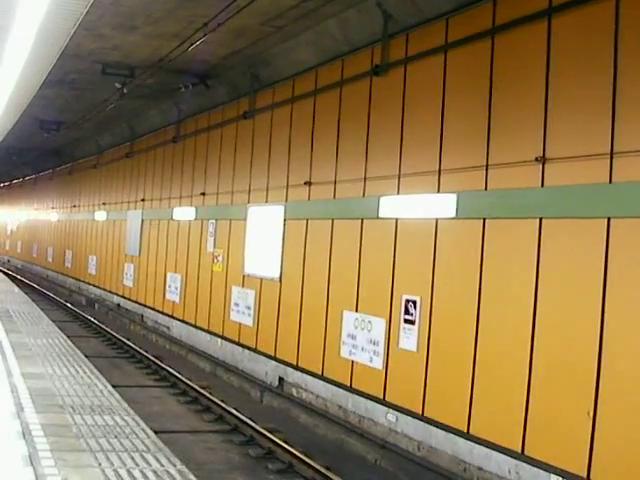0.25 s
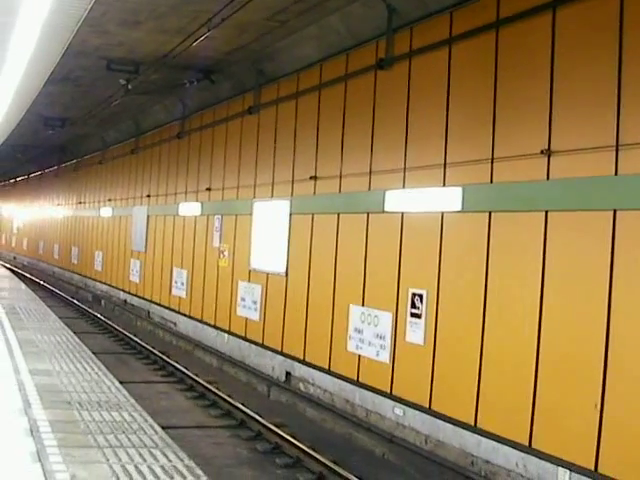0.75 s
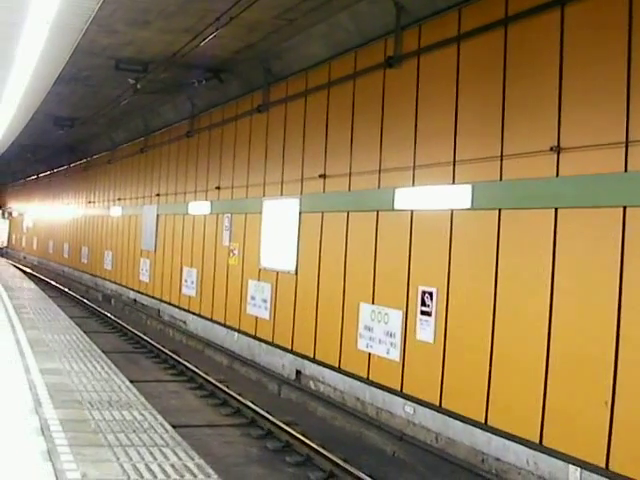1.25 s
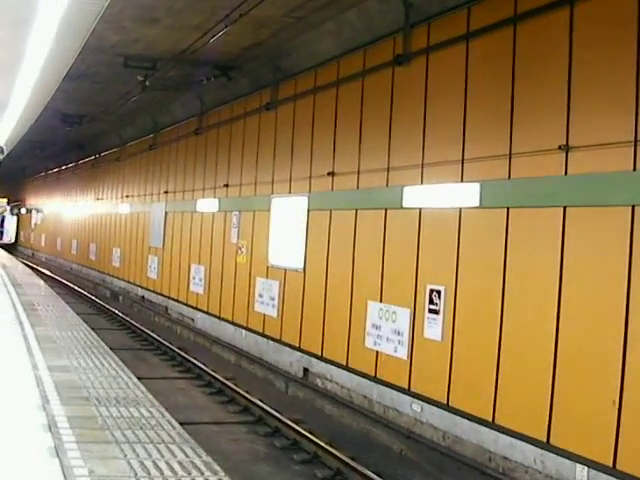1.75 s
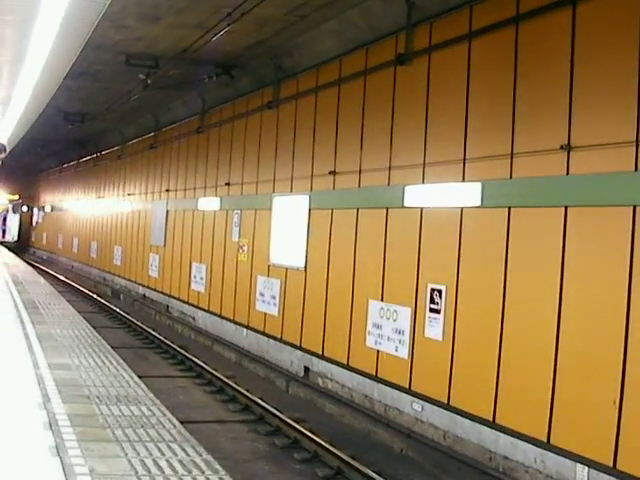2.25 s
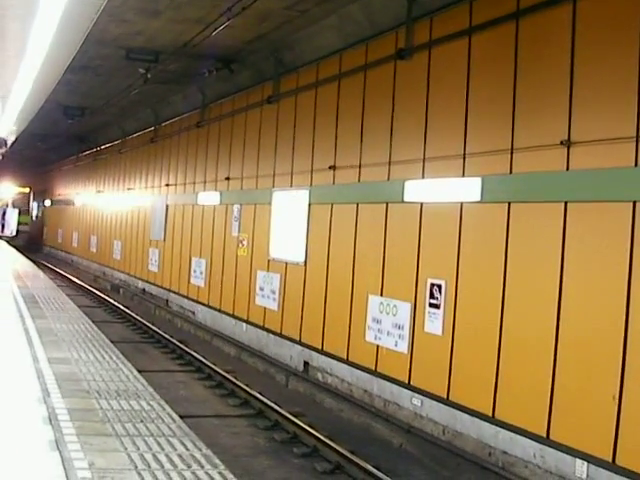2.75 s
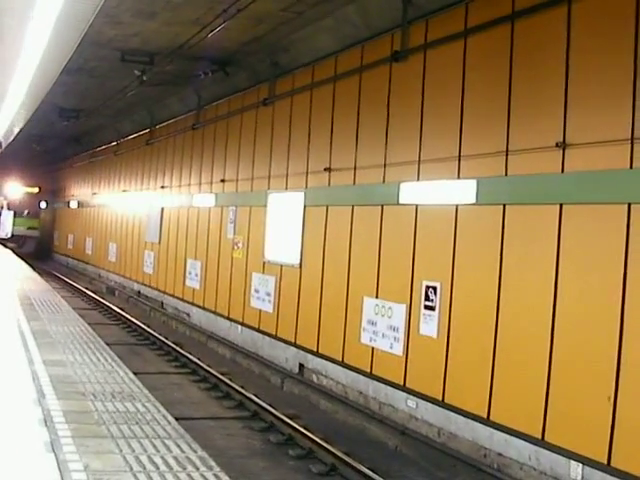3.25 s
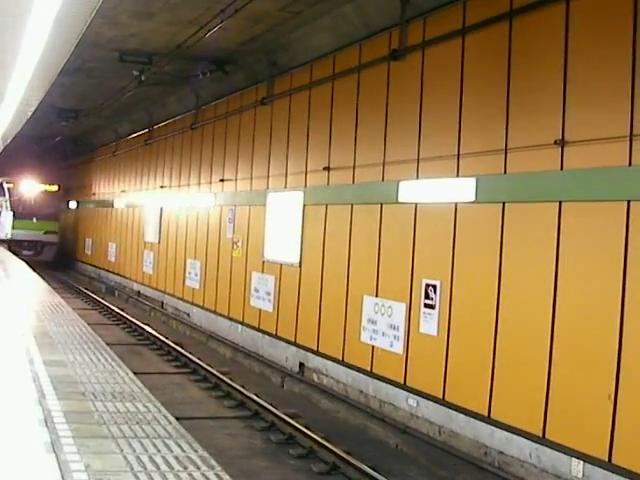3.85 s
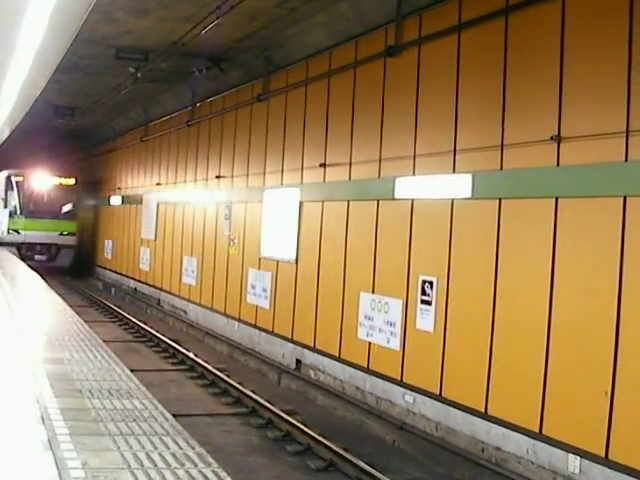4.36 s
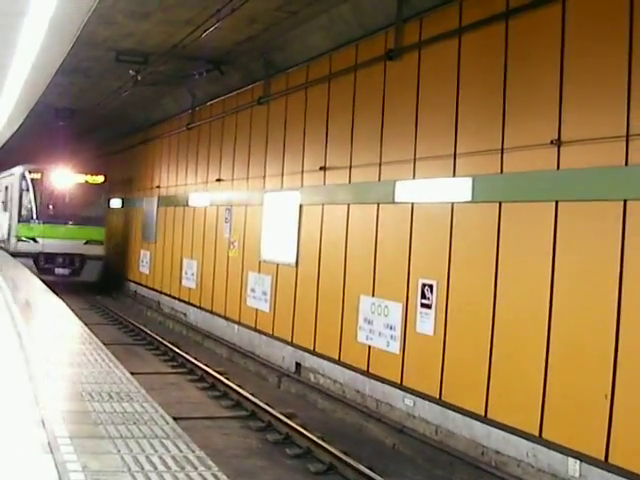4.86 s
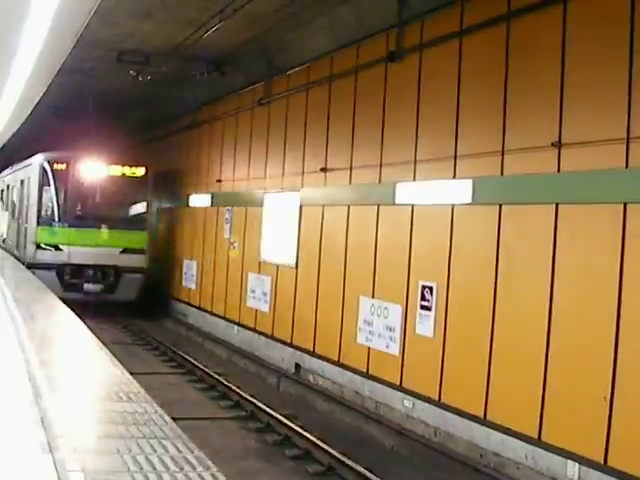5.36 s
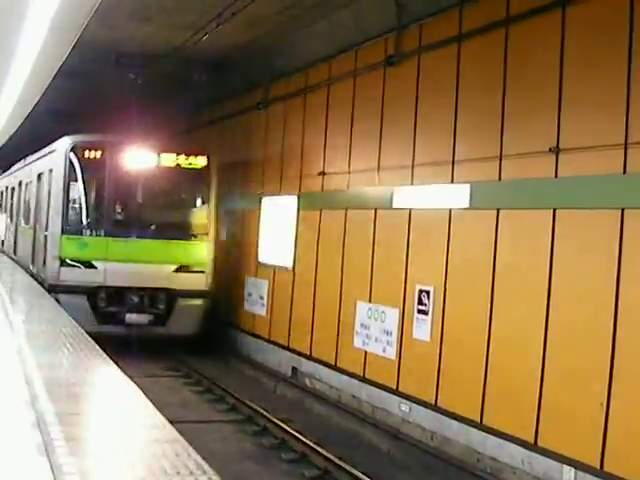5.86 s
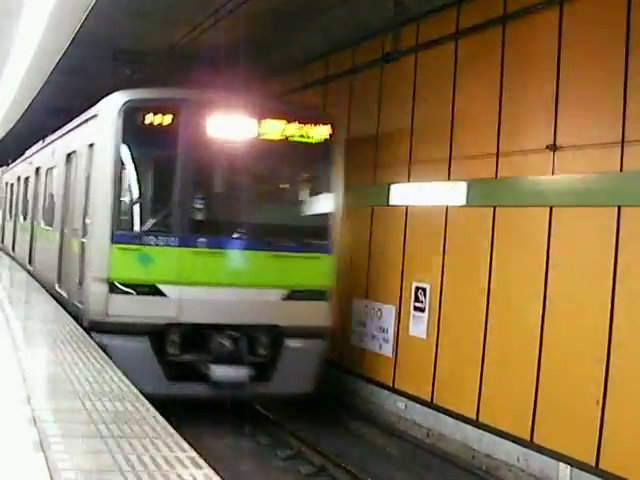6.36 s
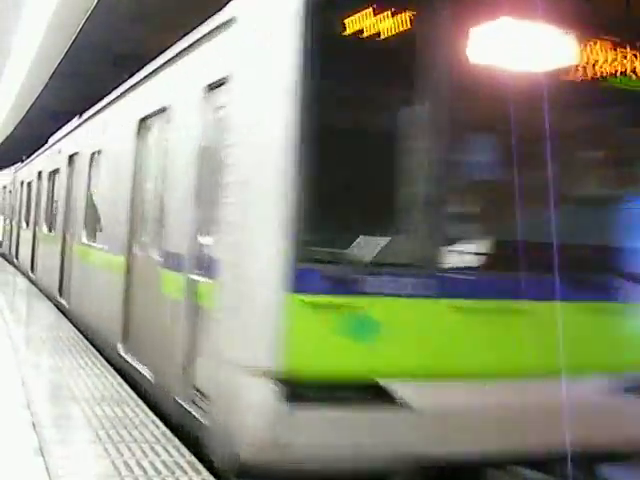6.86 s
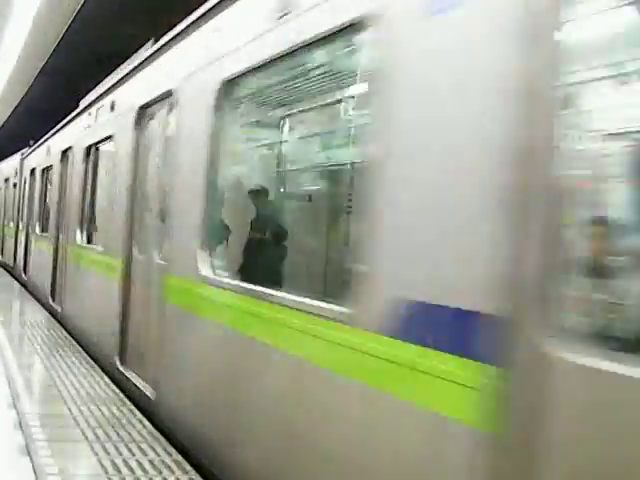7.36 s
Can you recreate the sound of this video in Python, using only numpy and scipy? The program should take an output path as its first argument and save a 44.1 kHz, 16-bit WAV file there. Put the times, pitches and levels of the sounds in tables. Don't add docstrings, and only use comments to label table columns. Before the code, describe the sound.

Steady booming rumble and steel rail roar fill an underground platform as a train arrives, thumping over joints and hissing brightly as it passes.

```python
import sys
import numpy as np
from scipy import signal
from scipy.fft import rfft, irfft, next_fast_len
from scipy.io import wavfile
from scipy.ndimage import uniform_filter1d, map_coordinates

SR = 44100
rng = np.random.default_rng(int(sys.argv[2]) if len(sys.argv) > 2 else 0)


def unload_wav(signal):
    wavfile.write(
        sys.argv[1],
        SR,
        np.round(np.clip(np.atleast_2d(signal).T, -1, 1) * 32767).astype(np.int16),
    )


def boost_factor(decibels):
    exponent = np.asarray(decibels, float) / 20
    return 10 ** exponent


N = 335821
SIZE = next_fast_len(N + SR // 2)
HZ = np.maximum(np.fft.rfftfreq(SIZE, 1 / SR), 1)
TIME_S = np.arange(N) / SR


def in_time(rows):
    s, *columns = np.transpose(rows)
    return [np.interp(TIME_S, s, c) for c in columns]


def at_hz(points):
    hz, value = np.transpose(points)
    return np.interp(np.log(HZ), np.log(hz), value)


def swell(at_s, half_s):
    return np.exp(-((TIME_S - at_s) / half_s) ** 2)


def swells(rows):
    return sum(db * swell(s, half_s) for s, db, half_s in rows)


def drift(rate_hz):
    r = np.exp(-80 * np.pi * rate_hz / SR)
    white = rng.standard_normal(N // 40 + 2002)
    slow = signal.lfilter([1], [1, -2 * r, r * r], white)[2000:]
    slow = slow / np.sqrt(np.mean(slow ** 2) + 1e-20)
    return np.interp(np.arange(N) / 40, np.arange(len(slow)), slow)


# f/Hz, share
PORT_LIKENESS = [(60, 0.58), (130, 0.86), (280, 0.85), (610, 0.69), (1330, 0.7), (2870, 0.33), (4500, 0.38),
                 (5600, 0.17), (6500, 0.24), (7800, 0.06)]
# f/Hz, level/dB
PORT_LEVEL = [(60, -1), (110, -3.5), (200, -5), (360, -6), (670, -5.5), (1220, -6.5), (2220, -1.5),
              (4050, 4.5), (7400, -0.5), (13500, -8)]
# f/Hz, phase/rad
PORT_PHASE = [(150, -.15), (400, -.1), (700, .2), (1030, .4), (2800, 1.0), (3700, .2), (4700, .6),
              (5800, 3.0), (7800, 3.1)]


def two_ports(shared, own):
    alike = np.clip(at_hz(PORT_LIKENESS), 0, 1)
    turn = boost_factor(at_hz(PORT_LEVEL) / 2) * np.exp(.5j * at_hz(PORT_PHASE))
    mixed = np.sqrt(alike) * shared + np.sqrt(1 - alike) * own
    return mixed * np.array([turn, 1 / turn])


def heard(waves):
    spectra = rfft(waves, SIZE)
    return irfft(two_ports(spectra[0], spectra[1:]), SIZE)[:, :N]


def rolling_noise(spectrum, level_db, modes=(), swell_db=1.0, patch_db=1.0, rate_hz=8.0, bands=4):
    white = rfft(rng.standard_normal((3, SIZE)))
    colour_db = at_hz(spectrum)
    for hz, width_hz, db in modes:
        colour_db = colour_db + db / (1 + (2 * (HZ - hz) / width_hz) ** 2)
    low_hz, high_hz = spectrum[0][0], spectrum[-1][0]
    sound = two_ports(white[0], white[1:]) * boost_factor(colour_db) * (HZ > low_hz) * (HZ < high_hz)
    place = (bands - 1) * np.log(HZ / low_hz) / np.log(high_hz / low_hz)
    together_db, out = swell_db * drift(rate_hz), 0
    for k in range(bands):
        band = irfft(sound * np.maximum(1 - abs(place - k), 0), SIZE)[:, :N]
        out = out + band * boost_factor(together_db + patch_db * drift(rate_hz))
    return boost_factor(level_db) * out / np.sqrt(np.mean(out.mean(axis=0) ** 2))


def resonance(x, hz, width_hz):
    r = np.exp(-np.pi * width_hz / SR)
    poles = [1, -2 * r * np.cos(2 * np.pi * hz / SR), r * r]
    return signal.lfilter([(1 - r * r) / 2, 0, (r * r - 1) / 2], poles, x)


def echo_clouds(events, rise_s, width_hz, level_db):
    out, t = np.zeros((3, SIZE)), np.arange(SR // 3) / SR
    for s, db, hz, t60_s in events:
        envelope = (1 - np.exp(-t / rise_s)) * boost_factor(-60 * t / max(t60_s, .03))
        cloud = rng.standard_normal((3, len(t))) * envelope
        rung = resonance(resonance(cloud, hz, width_hz), hz, 2 * width_hz)
        at = round(s * SR)
        out[:, at:at + len(t)] += boost_factor(db + level_db) * rung / abs(rung).max(axis=1, keepdims=True)
    return out[:, :N]


def load_swings(events, rise_s, t60_s, trim_db):
    out, t = np.zeros((3, SIZE)), np.arange(SR // 6) / SR
    shape = (1 - np.exp(-t / rise_s)) ** 2 * boost_factor(-60 * t / t60_s)
    shape = shape / shape.max()
    for (s, db, hz), start in zip(events, rng.uniform(0, 2 * np.pi, (len(events), 3))):
        at = round(s * SR)
        wave = np.sin(2 * np.pi * hz * t + start[:, None])
        out[:, at:at + len(t)] += boost_factor(db + trim_db) * shape * wave
    return out[:, :N]


# t/s, level/dB
NEARNESS = [(0.0, -38), (0.04, -34.5), (0.42, -42), (0.59, -40), (0.9, -42), (3.73, -37.5), (3.79, -44.5),
            (3.86, -39.5), (5.11, -38), (5.81, -33), (5.85, -35.5), (6.06, -31.5), (6.42, -36),
            (6.7, -30.5), (6.9, -32), (7.0, -34.5), (7.5, -33), (7.61, -35)]


def nearness_db():
    return in_time(NEARNESS)[0]


# f/Hz, density/dB per Hz
STATION_SPECTRUM = [(13, -55), (22, -45), (65, 0), (124, -1.5), (150, -4.5), (200, -63), (330, -120)]


def station_rumble():
    return rolling_noise(STATION_SPECTRUM, -39.5, swell_db=-0.8, patch_db=-2.5, rate_hz=11.0, bands=2)


# f/Hz, density/dB per Hz
BOOM_SPECTRUM = [(74, -53), (125, -21.5), (151, -12), (183, -3.5), (252, 1), (294, -0.5), (351, -25),
                 (380, -6.5), (490, -45), (840, -120)]
# f/Hz, width/Hz, level/dB
BOOM_MODES = [(185.5, 8.5, 5), (245.9, 5.9, 5), (270, 9.5, 4), (296.5, 8.6, 4)]
# t/s, rise/dB, half length/s
BOOM_SURGES = [(0.077, 0, 0.012), (0.27, 4.5, 0.16), (0.516, 5, 0.069), (1.785, 4, 0.015), (2.424, 3, 0.11),
               (2.745, 4.5, 0.24), (3.0, 2, 0.15), (4.547, -0.5, 0.17), (3.4, 1.5, 0.47),
               (3.874, 6.5, 0.019), (5.003, 10, 0.02), (5.7, 2.5, 0.7), (6.45, 4, 0.024), (7.062, 7, 0.024),
               (7.163, 10, 0.02), (7.416, 5.5, 0.092)]


def tunnel_boom():
    start_db, sag_db_per_s = -24.5, -0.315
    level_db = start_db + sag_db_per_s * TIME_S + swells(BOOM_SURGES)
    return rolling_noise(BOOM_SPECTRUM, level_db, BOOM_MODES,
                         swell_db=0.78, patch_db=1.0, rate_hz=8.1, bands=3)


# f/Hz, density/dB per Hz
ROAR_SPECTRUM = [(190, -15.5), (330, 3), (360, -11), (436, 1.5), (497, -0.5), (744, 4), (1010, 0.5),
                 (1290, -8.5), (1600, -9), (2080, -80), (3520, -120)]
# f/Hz, width/Hz, level/dB
RAIL_MODES = [(422, 58, 2), (626, 27, 1.5), (780, 59, -1), (1040, 17, 1), (1212, 16, 8.5)]
# t/s, rise/dB, half length/s
ROAR_SWELLS = [(.1, 1, 0.087), (1.15, -0.5, .15), (1.95, 0.5, 0.079), (2.45, 0, .12), (2.95, 0, .12),
               (3.4, 0.5, 0.24), (3.85, 1, 0.071), (4.9, 0.5, 0.14), (5.15, -0.5, .1), (6.8, 0, 0.11),
               (7.06, 1.5, .04)]


def rail_roar():
    return rolling_noise(ROAR_SPECTRUM, -22.0 + swells(ROAR_SWELLS), RAIL_MODES,
                         swell_db=0.4, patch_db=0.05, rate_hz=14.0, bands=6)


# f/Hz, density/dB per Hz
RING_SPECTRUM = [(820, -14.5), (1400, -1), (1830, -5.5), (2380, -7), (2620, -13), (3200, -11.5),
                 (4160, -20), (7040, -120)]
# f/Hz, width/Hz, level/dB
WHEEL_MODES = [(1620, 57, -2.5), (2050, 92, 2.5)]
# t/s, rise/dB, half length/s
RING_SWELLS = [(0.602, 4, 0.076), (1.2, -5, 0.054), (1.95, 2.5, 0.1), (2.45, 1.5, 0.11), (3.45, 2, 0.13),
               (4.145, 3.5, 0.16), (4.3, 1, 0.11), (5.203, -2, 0.15), (6.097, 4, 0.06), (6.5, 1.5, .07),
               (6.75, -4, .2), (7.106, 2.5, .06), (7.3, -4, 0.089)]


def wheel_ring():
    mean_db, follow_share = -32.5, 0.3
    near_db = nearness_db()
    level_db = mean_db + follow_share * (near_db - near_db.mean()) + swells(RING_SWELLS)
    return rolling_noise(RING_SPECTRUM, level_db, WHEEL_MODES,
                         swell_db=1.5, patch_db=0.0, rate_hz=19.0, bands=3)


# f/Hz, density/dB per Hz
HISS_SPECTRUM = [(1650, -8.5), (2800, -2.5), (3950, -4.5), (4450, -7.5), (5420, -6.5), (6910, -18),
                 (7470, -19.5), (7900, -2), (10300, -73), (17400, -120)]


def contact_hiss():
    return rolling_noise(HISS_SPECTRUM, nearness_db(), swell_db=0.5, patch_db=1.5, rate_hz=17.0, bands=5)


# t/s, level/dB, f/Hz, t60/s
BRAKE_HISSES = [
    (0, -26, 5000, 0.53),
    (.56, -33, 4800, 0.81),
    (6.55, -28, 2630, 0.56),
    (6.68, -29, 3820, 0.76),
    (6.72, -27, 4000, 1.2),
    (6.88, -24, 3530, 0.19),
    (7.42, -30, 3900, .8),
    (6.17, -31, 3860, .5),
]


def brake_hisses():
    return echo_clouds(BRAKE_HISSES, rise_s=0.048, width_hz=820.0, level_db=1.5)


# t/s, level/dB, f/Hz, t60/s
FLANGE_SQUEAKS = [(0.02, -23.5, 2000, 0.6), (0.6784, -38, 1530, 0.54), (1.9465, -26, 1520, 0.3),
                  (4.168, -27, 1620, 0.36), (4.2468, -33, 1660, 0.67), (6.0487, -25, 1920, 0.47),
                  (6.1001, -42, 1980, 0.55), (7.1212, -22, 1570, 0.25), (7.1994, -43, 1648, 0.5),
                  (7.2994, -24, 1710, 0.7), (7.4073, -33, 1720, 0.62), (7.4997, -28, 1610, 0.5)]


def flange_squeaks():
    return echo_clouds(FLANGE_SQUEAKS, rise_s=0.0058, width_hz=160.0, level_db=2.0)


# t/s, level/dB, f/Hz
AXLE_THUMPS = [(0.073, -13, 245), (0.147, -15.5, 246), (0.198, -11, 275), (0.302, -8, 280),
               (0.537, -15, 245), (0.637, -15, 223), (0.714, -15, 279), (0.999, -16, 240), (1.35, -9, 250),
               (1.554, -11, 257), (1.775, -12, 237.5), (2.041, -16, 216), (2.394, -15, 228),
               (2.448, -10, 276), (2.766, -17, 240), (2.795, -17, 264), (2.832, -17, 288), (3.132, -8, 248),
               (3.332, -16, 277), (3.382, -11, 277), (3.407, -7.5, 259), (3.455, -13, 282),
               (3.481, -23, 264), (3.588, -13, 220), (3.629, -24, 277), (4.325, -9.5, 250),
               (4.368, -17, 250), (4.425, -14, 260), (4.682, -13, 267), (4.823, -10, 267), (4.971, -7, 274),
               (5.031, -13, 247), (5.079, -9, 236), (5.195, -17, 258), (5.706, -11, 244), (5.883, -16, 260),
               (6.139, -13, 258), (6.308, -11.5, 258), (6.355, -15, 236), (6.553, -15.5, 300),
               (7.004, -28, 283), (7.129, -13, 205), (7.155, -11, 269), (7.403, -10, 299)]


def axle_thumps():
    return load_swings(AXLE_THUMPS, rise_s=0.0029, t60_s=0.077, trim_db=-5)


# t/s, level/dB, f/Hz
RAIL_END_RINGS = [(0.1, -17, 786), (0.378, -13, 633), (0.512, -15, 850), (0.637, -14, 805),
                  (0.732, -14, 789), (0.9, -16, 799), (1.015, -11, 660), (1.083, -16, 584),
                  (1.222, -18, 861), (1.35, -13, 654), (1.587, -13, 985), (1.736, -16, 920),
                  (1.822, -14.5, 800), (1.898, -14, 760), (1.992, -12.5, 564), (2.175, -14, 738),
                  (2.239, -16, 673), (2.395, -13, 636), (2.518, -14, 608), (2.753, -15, 753),
                  (2.903, -15, 745), (3.096, -16, 633), (3.342, -14, 711), (3.61, -13.5, 635),
                  (3.672, -14, 764), (3.735, -14, 802), (3.822, -14, 774), (3.922, -12, 726),
                  (3.986, -13, 730), (4.06, -16, 618), (4.213, -17, 608), (4.481, -14, 896),
                  (4.673, -16, 859), (4.782, -17, 760), (4.874, -16, 840), (5.126, -10, 634),
                  (5.383, -17, 756), (5.526, -13, 633), (5.676, -14, 579), (5.754, -16, 762),
                  (5.82, -13, 730), (5.934, -14, 638), (6.128, -18, 853), (6.295, -14, 725),
                  (6.543, -14, 726), (6.645, -11.5, 684), (6.896, -14, 781), (6.996, -14, 716),
                  (7.248, -15, 614), (7.47, -19, 675)]


def rail_end_rings():
    return load_swings(RAIL_END_RINGS, rise_s=0.0037, t60_s=.09, trim_db=-8)


# t/s, level/dB
WHEEL_CLACKS = [(0.57, -27), (0.65, -23), (1.76, -27), (2.08, -31), (2.699, -37), (3.869, -25), (4.08, -29),
                (4.52, -29), (4.8, -34), (4.299, -23), (4.988, -24.5), (5.2693, -25), (5.4696, -28),
                (5.6803, -22), (6.029, -17.5), (6.184, -18.5), (6.5186, -33), (6.8997, -36), (7.099, -18.5),
                (7.329, -18.5), (7.499, -18.5)]


def wheel_clacks():
    hz, t60_s = 3200, 0.43
    events = [(s, db, hz, t60_s) for s, db in WHEEL_CLACKS]
    return echo_clouds(events, rise_s=0.0017, width_hz=2500.0, level_db=-2.5)


# t/s, level/dB, f/Hz, t60/s
JOINT_KNOCKS = [(0.68, -11.5, 1080, 0.43), (0.919, -12, 865, 0.24), (1.587, -8, 1050, 0.24),
                (1.736, -15, 880, 0.45), (1.782, -10, 990, 0.11), (2.049, -11.5, 604, 0.25),
                (3.243, -10, 744, 0.083), (3.752, -6, 960, 0.078), (3.986, -18, 790, 0.074),
                (4.039, -11, 660, 0.14), (4.481, -17, 896, 0.17), (4.999, -13, 692, 0.11),
                (6.039, -30, 657, 0.16), (6.519, -12, 767, 0.22), (6.955, -17, 710, 0.13),
                (7.115, -22, 925, 0.28), (7.399, -18, 980, 0.2)]


def joint_knocks():
    return echo_clouds(JOINT_KNOCKS, rise_s=0.00056, width_hz=450.0, level_db=-3.5)


# t/s, level/dB, f/Hz
JOINT_TICKS = [(0.681, -7, 1130), (0.9, -7.5, 805), (1.56, -11, 930), (1.587, -10, 1020), (1.736, -7.5, 905),
               (1.822, -11, 850), (2.175, -12, 674), (2.395, -13, 638), (3.341, -9, 734), (3.758, -11, 890),
               (3.803, -9, 786), (3.922, -13, 730), (3.986, -11, 716), (4.458, -9, 890), (4.481, -11, 896),
               (5.084, -36, 766), (5.676, -14, 855), (6.543, -30, 720), (6.895, -9, 824), (6.946, -7.5, 694),
               (7.115, -24, 895)]


def joint_ticks():
    t60_s, trim_db = 0.026, -5.0
    out, t = np.zeros((3, SIZE)), np.arange(SR // 20) / SR
    for (s, db, hz), sign in zip(JOINT_TICKS, rng.choice([-1, 1], (len(JOINT_TICKS), 1))):
        at = round(s * SR)
        out[:, at:at + len(t)] += sign * boost_factor(db + trim_db - 60 * t / t60_s) * np.sin(2 * np.pi * hz * t)
    high_pass = signal.butter(2, 300, "high", fs=SR, output="sos")
    return signal.sosfilt(high_pass, out[:, :N] + 1e-18)


# t/s, f/Hz, level/dB
GEAR_WHINE = [(1.5, 2410, -62), (2.4, 2405, -49), (2.6, 2410, -45), (3.0, 2415, -45), (3.5, 2420, -44),
              (4.0, 2385, -44.5), (4.7, 2360, -43.5), (5.4, 2385, -44), (5.9, 2400, -42),
              (6.4, 2410, -43.5), (6.7, 2440, -40.5), (7.0, 2430, -43.5), (7.6, 2420, -50)]


def gear_whine():
    width_hz, flicker_db, steady = 45.0, 1.5, .75
    hz, level_db = in_time(GEAR_WHINE)
    turn = 2 * np.pi * np.cumsum(hz + 14 * drift(9.0)) / SR
    waves = []
    for _ in range(3):
        in_phase = (steady + drift(width_hz)) * np.cos(turn)
        waves.append(in_phase + drift(width_hz) * np.sin(turn))
    return boost_factor(level_db + flicker_db * drift(9.1)) * np.array(waves)


# t/s, level/dB, f/Hz, t60/s
SINGING_TONES = [(3.31, -23, 690, .9), (3.48, -46, 5110, 1.2), (4.8, -23, 780, .9), (5.82, -23, 800, .8),
                 (6.52, -23, 720, .8), (3.745, -19, 990, .25), (3.88, -24, 1010, .7), (4.085, -22, 1720, .5),
                 (4.12, -24, 1370, .4), (4.11, -32, 2000, .5), (4.16, -33, 1780, .5), (4.295, -28, 1400, .25)]


def singing_tones():
    rise_s, wobble, rough = 0.014, 0.009, .8
    out, t = np.zeros((3, SIZE)), np.arange(SR // 2) / SR
    starts = rng.uniform(0, 2 * np.pi, (len(SINGING_TONES), 5))
    for (s, db, hz, t60_s), start in zip(SINGING_TONES, starts):
        turn = 2 * np.pi * np.cumsum(hz * (1 + wobble * np.sin(60 * t + start[3]))) / SR
        flutter = 1 + rough * np.sin(150 * t + 2 * np.sin(47 * t) + start[4])
        envelope = flutter * (1 - np.exp(-t / rise_s)) * boost_factor(db - 60 * t / t60_s)
        at = round(s * SR)
        out[:, at:at + len(t)] += envelope * np.sin(turn + start[:3, None])
    return out[:, :N]


# t/s, extra left delay/ms
LEFT_LAG = [(0, 0), (4, .008), (5.7, .045), (7.6, .095)]


def turn_bearing(train):
    lag_ms, = in_time(LEFT_LAG)
    places = np.arange(N) - lag_ms * SR / 1000
    train[0] = map_coordinates(train[0], [places], order=3, mode="nearest")
    return train


def scene():
    train = station_rumble() + tunnel_boom() + rail_roar() + wheel_ring() + contact_hiss()
    contacts = brake_hisses() + flange_squeaks() + axle_thumps() + rail_end_rings()
    contacts += wheel_clacks() + joint_knocks() + joint_ticks()
    tones = gear_whine() + singing_tones()
    return turn_bearing(train + heard(contacts + tones))


def starved(x, share, low_hz, high_hz):
    hz, _, cells = signal.stft(x, SR, nperseg=2048, noverlap=1024)
    field = uniform_filter1d(rng.standard_normal(cells.shape), size=5, axis=0)
    field = uniform_filter1d(field, size=3, axis=1)
    in_band = (hz > low_hz) & (hz < high_hz)
    dropped = (field < np.quantile(field[:, ::9], share)) & in_band[:, None]
    return signal.istft(cells * ~dropped, SR, nperseg=2048, noverlap=1024)[1][:N]


def patchy_stereo(x):
    mid = starved((x[0] + x[1]) / 2, .1, 4700, 8000)
    side = starved((x[0] - x[1]) / 2, .24, 150, 2700)
    return np.array([mid + side, mid - side])


FIRST_RATE_HZ = 16000
# f/Hz, level/dB
SMOOTHING = [(6800, 0), (7400, -6), (7700, -18), (8000, -49)]


def low_rate(x):
    passed = boost_factor(at_hz(SMOOTHING)) * (HZ < FIRST_RATE_HZ / 2)
    return irfft(rfft(x, SIZE) * passed, SIZE)


TOP_DIP_AT_S, TOP_DIP_S = 4.3, 1.4
# f/Hz, level/dB
MIRROR_SPECTRUM = [(8100, 5), (8600, 1), (9000, -2.5), (10000, -9), (11000, -15.5), (12300, -18),
                   (13000, -21.5), (13600, -28)]


def mirror_image(below):
    strength_db, follow_share, left_minus_right_db = 0.1, -0.13, -3
    flipped = 2 * below * np.cos(2 * np.pi * FIRST_RATE_HZ * np.arange(SIZE) / SR)
    image = rfft(flipped) * boost_factor(at_hz(MIRROR_SPECTRUM)) * (HZ > FIRST_RATE_HZ / 2) * (HZ < 13590)
    top_share = np.clip((HZ - 11800) / 1000, 0, 1)
    near_db = nearness_db()
    whole_db = strength_db + follow_share * (near_db - near_db.mean())
    edge_db = 1.0 - 5 * swell(TOP_DIP_AT_S, TOP_DIP_S)
    edge = boost_factor(edge_db + 1.7 * drift(7.9)) * irfft(image * top_share, SIZE)[:, :N]
    mirror = irfft(image * (1 - top_share), SIZE)[:, :N] + edge
    balance_db = left_minus_right_db * np.array([[.5], [-.5]])
    return mirror * boost_factor(whole_db + 0.79 * drift(16.0)) * boost_factor(balance_db)


def ragged(x):
    gap_low_hz, gap_high_hz, gap_ragged_hz = 7450, 8300, 210
    top_hz, top_sag_hz, top_ragged_hz = 13600, 600, 330
    speck_share, speck_from_hz = .17, 6400
    hz, s, cells = signal.stft(x, SR, nperseg=2048, noverlap=1024)
    hz = hz[:, None]
    chance = uniform_filter1d(rng.standard_normal((3, len(s))), size=2, axis=1) * np.sqrt(2)
    low = gap_low_hz + gap_ragged_hz * chance[0]
    high = gap_high_hz + gap_ragged_hz * chance[1]
    sag = top_sag_hz * np.exp(-((s - TOP_DIP_AT_S) / TOP_DIP_S) ** 4)
    top = top_hz - sag + top_ragged_hz * chance[2]
    kept = ((hz < low) | (hz > high)) & (hz < top)
    specks = uniform_filter1d(rng.standard_normal(kept.shape), size=6, axis=0)
    kept = kept & ((specks > np.quantile(specks[:, ::9], speck_share)) | (hz < speck_from_hz))
    return signal.istft(cells * kept, SR, nperseg=2048, noverlap=1024)[1][:, :N]


def band_limit(x):
    return signal.sosfilt(signal.butter(12, 14100, fs=SR, output="sos"), x)


def record(dry):
    rounded = 0.84 * np.tanh(dry / 0.95)
    below = low_rate(patchy_stereo(rounded))
    mix = ragged(below[:, :N] + mirror_image(below))
    return band_limit(mix)


dry = scene()
out = record(dry)
unload_wav(out)
```